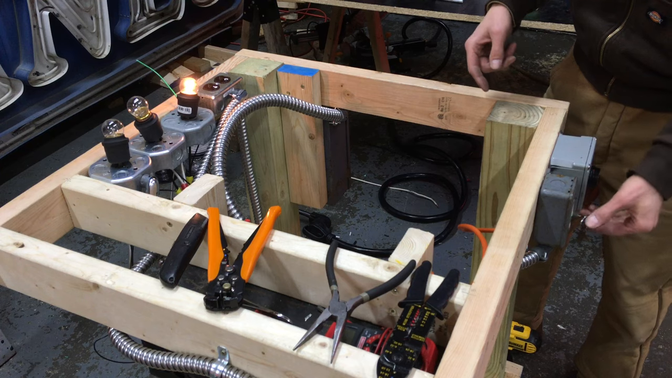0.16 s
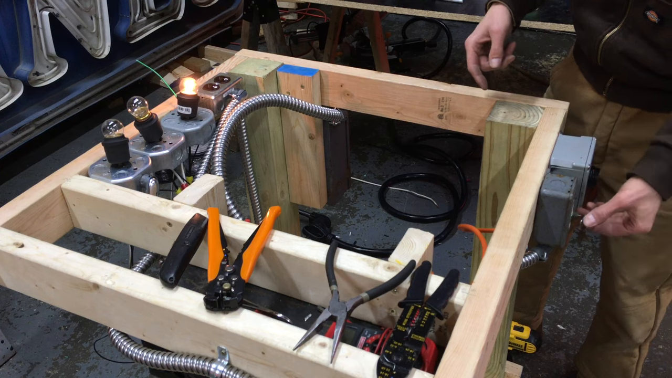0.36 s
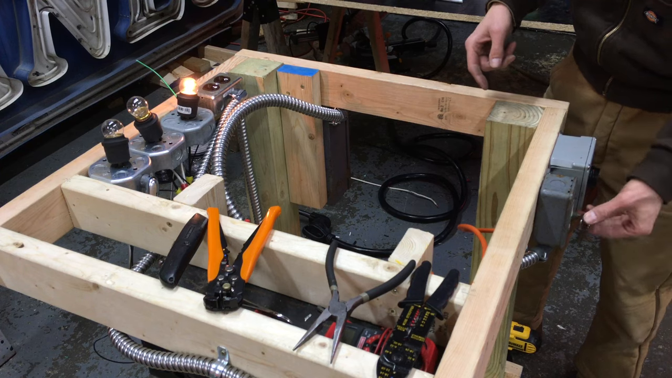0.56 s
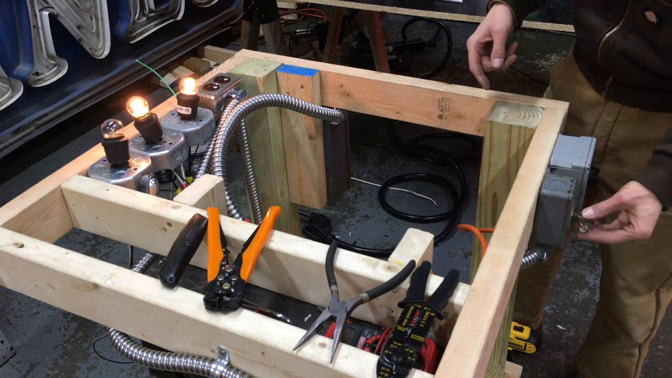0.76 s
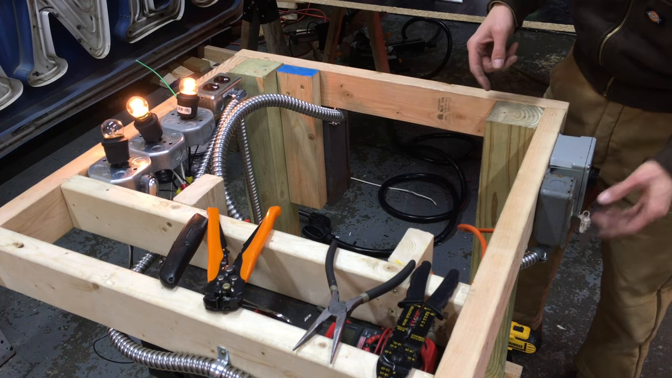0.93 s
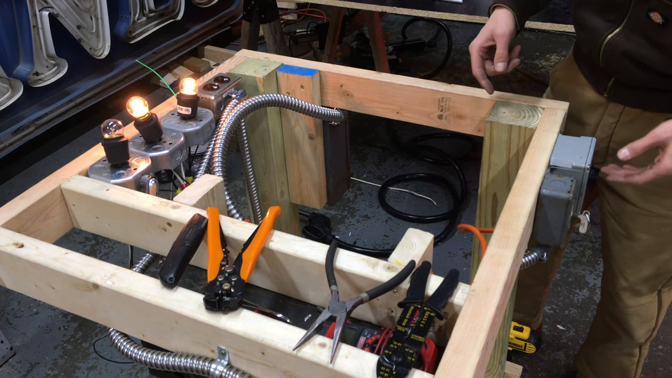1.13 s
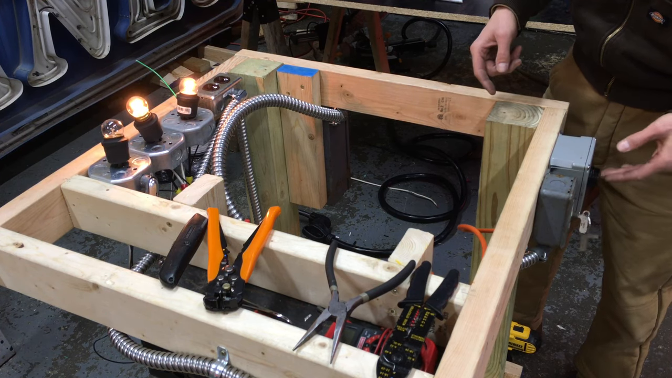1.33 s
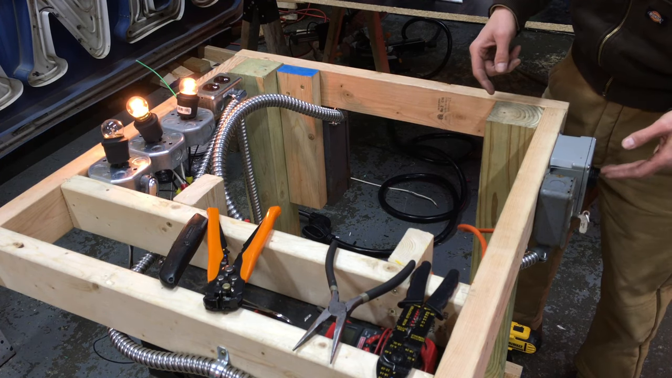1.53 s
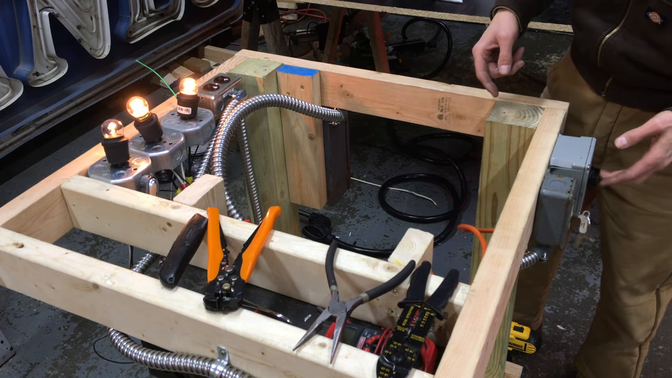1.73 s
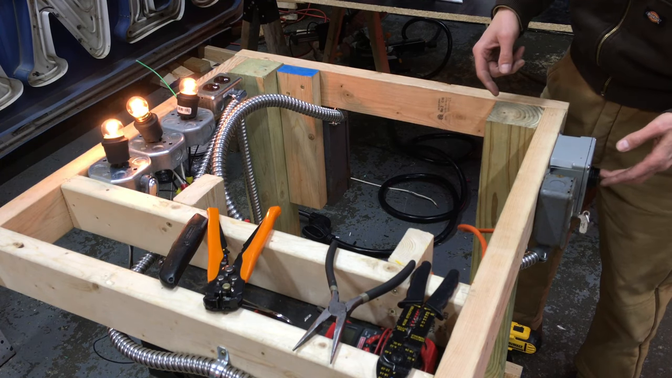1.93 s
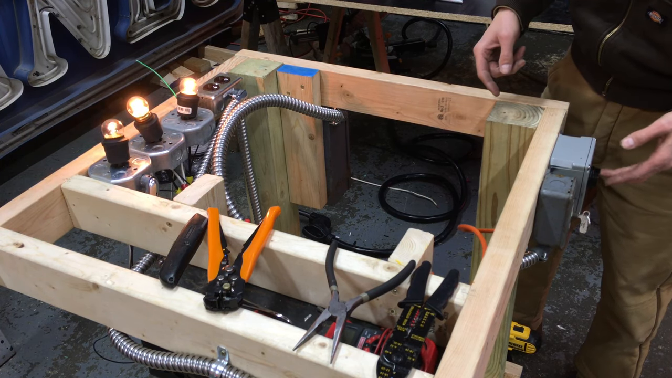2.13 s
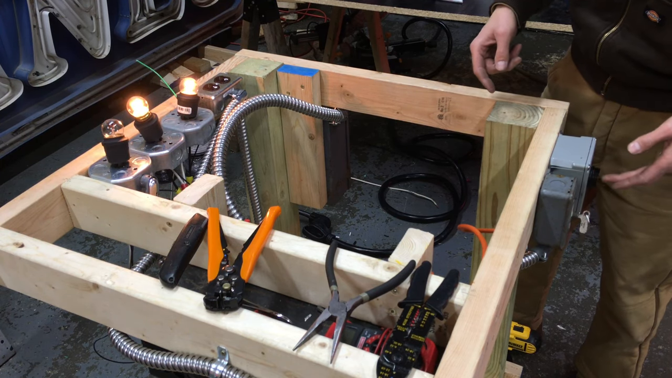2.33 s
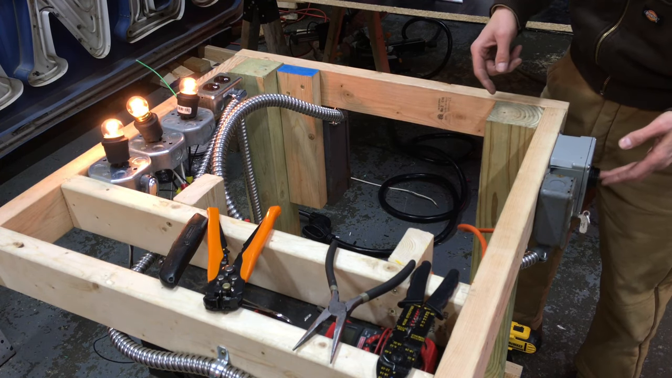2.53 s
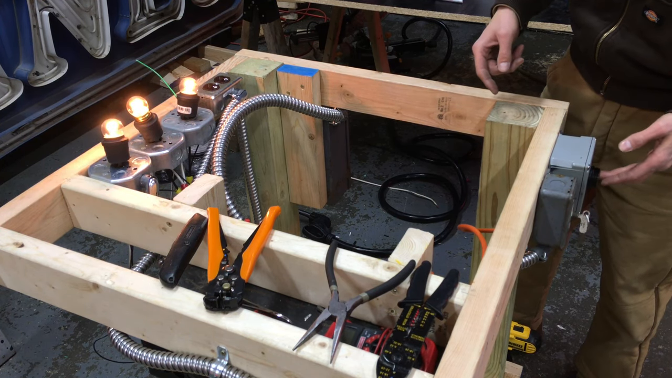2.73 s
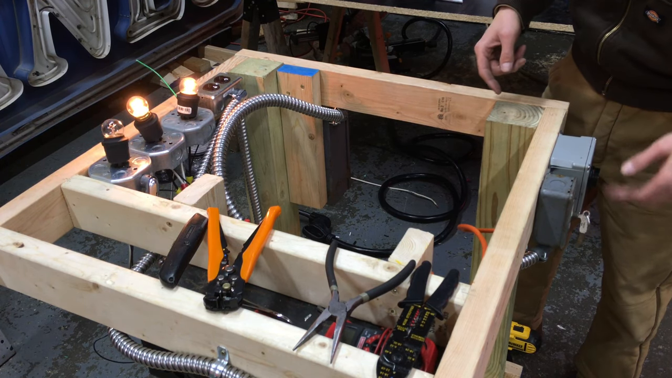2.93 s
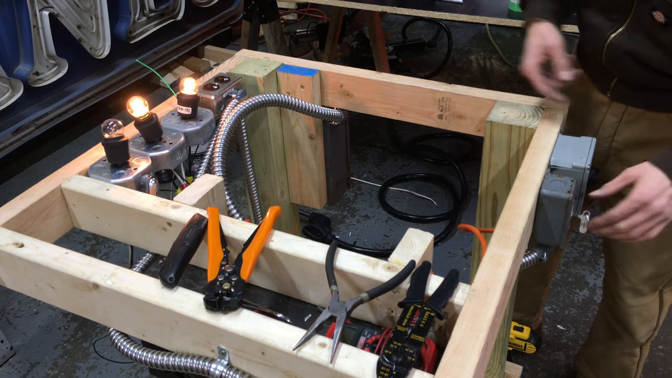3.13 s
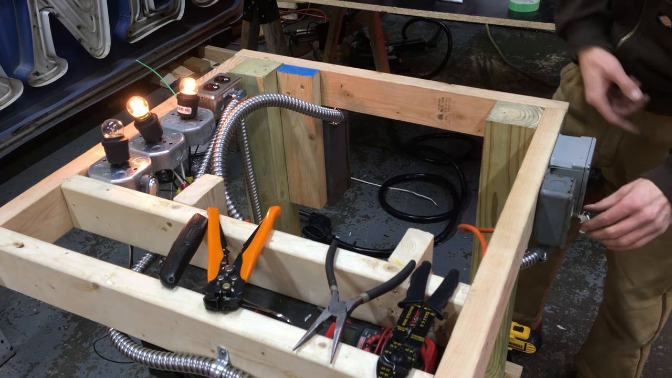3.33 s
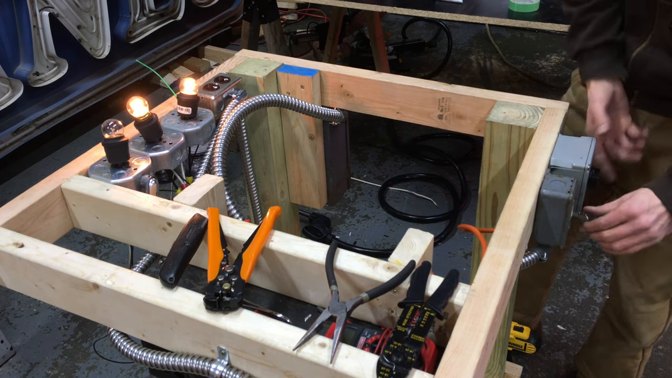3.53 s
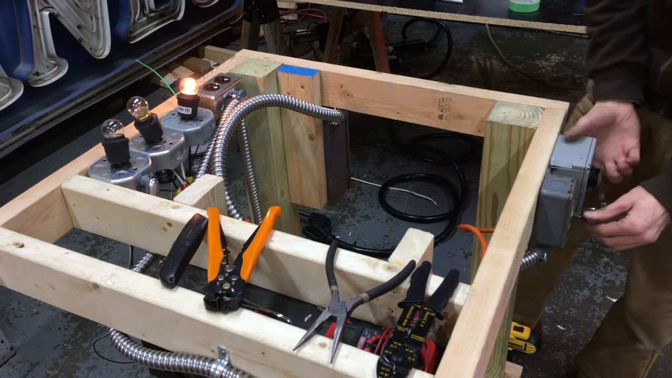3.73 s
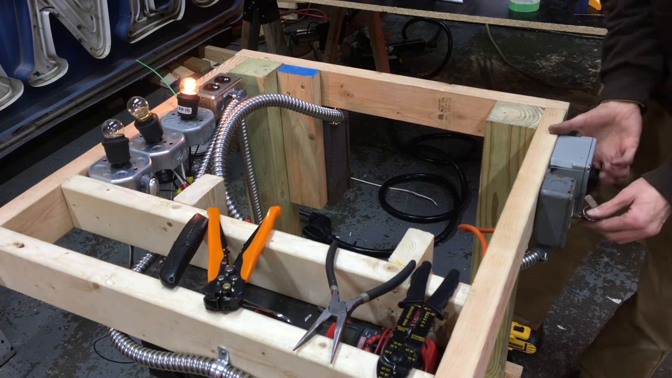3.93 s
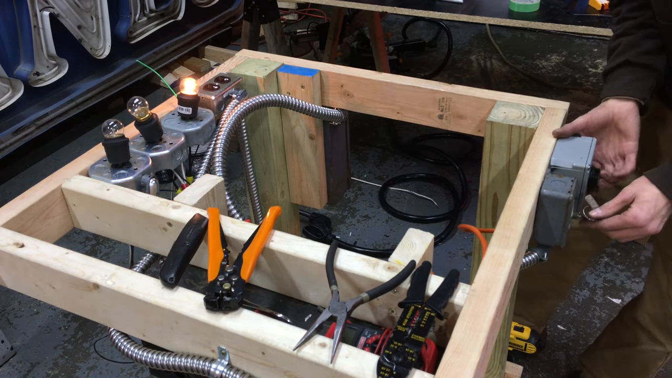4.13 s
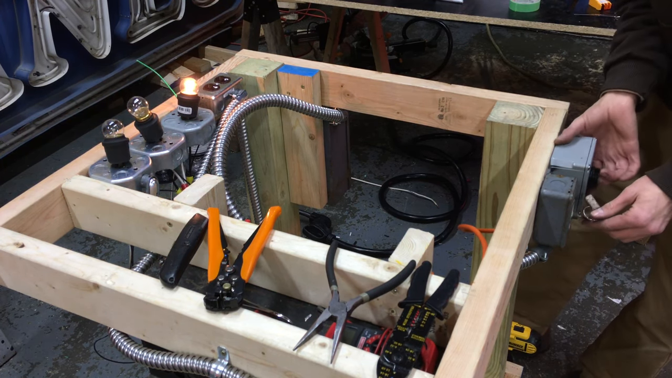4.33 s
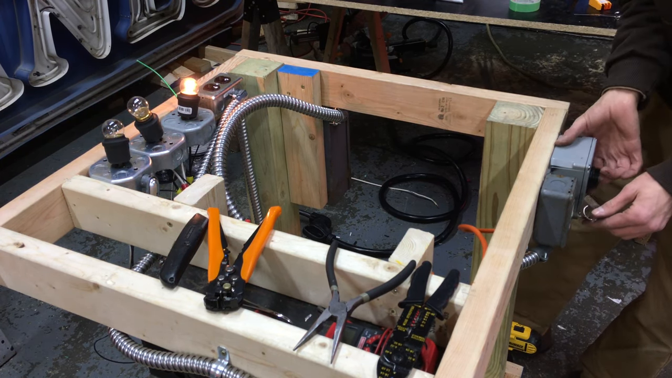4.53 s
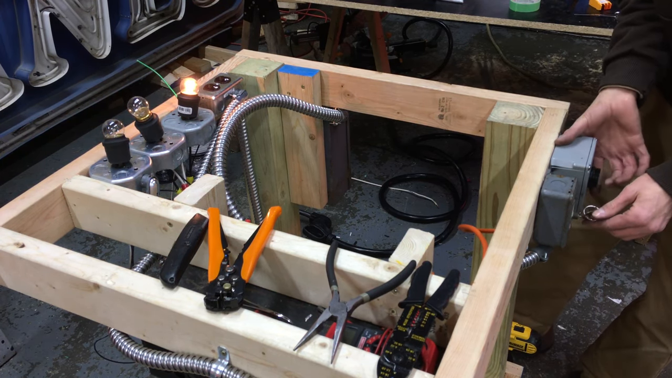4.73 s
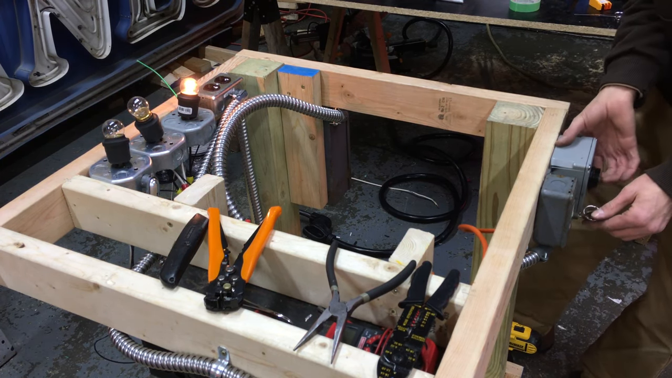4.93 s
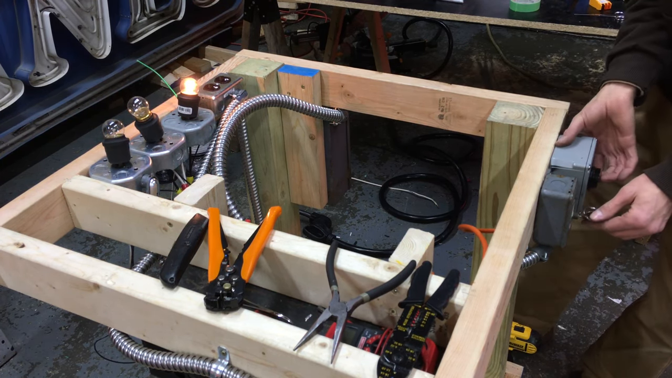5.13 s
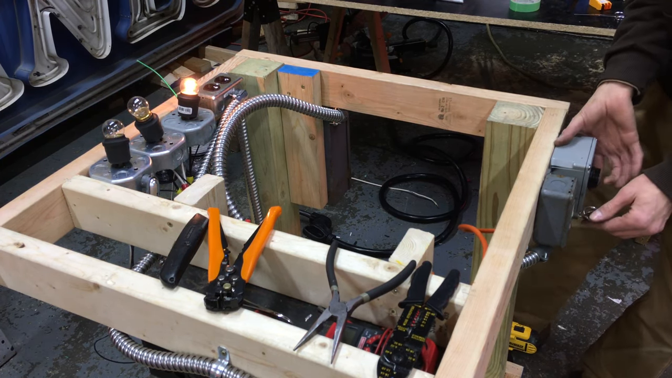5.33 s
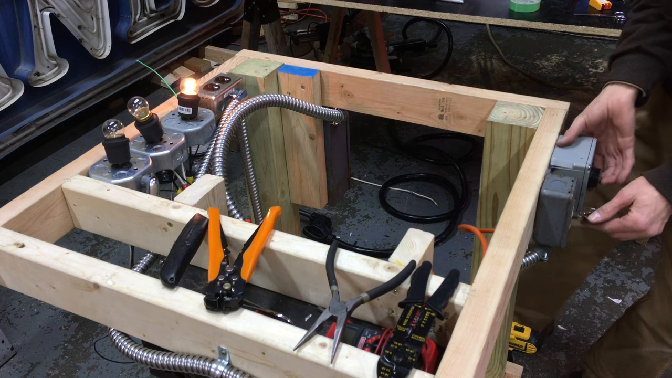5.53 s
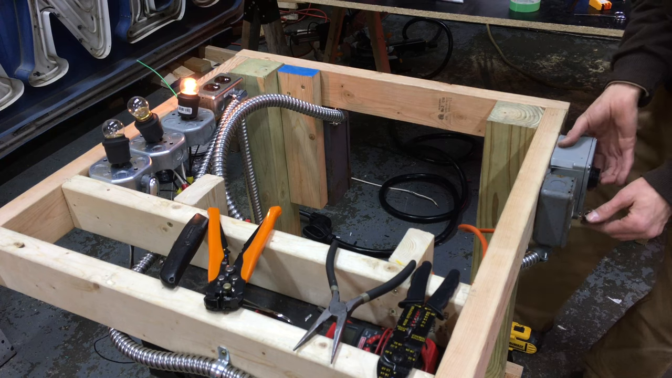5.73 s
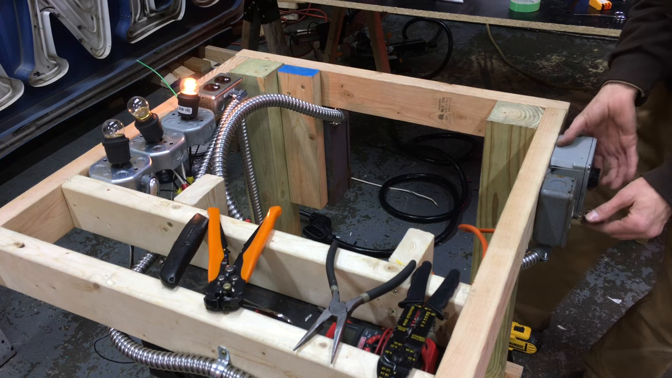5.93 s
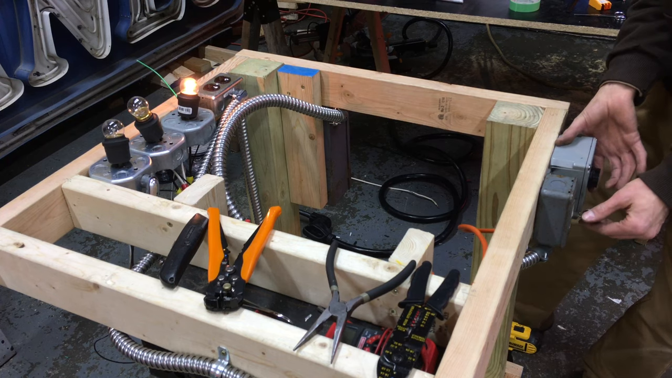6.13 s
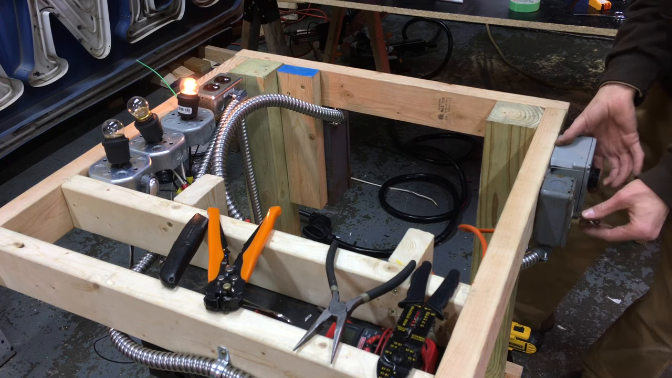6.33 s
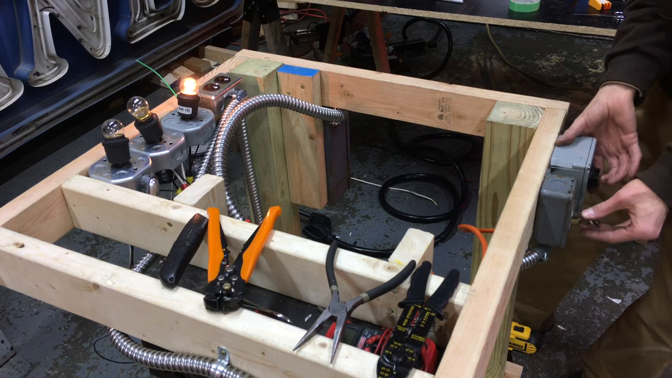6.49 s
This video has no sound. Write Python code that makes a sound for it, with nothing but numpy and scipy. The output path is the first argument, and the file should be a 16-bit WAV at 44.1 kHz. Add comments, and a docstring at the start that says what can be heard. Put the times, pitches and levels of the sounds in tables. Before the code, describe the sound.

Close microphone, hard-surfaced workshop: crisp switch clicks and dangling keys, then four violent contactor cracks alternating between ringing metallic clangs and drier slams with woody thuds. After a short pause comes one very loud snap with a cluster of clicks and key tinkles, thinning into small irregular ticks and faint handling rubs. A low throbbing machine hum and steady hiss lie underneath.

```python
"""A contactor in a steel box slams four times, pulling in and dropping out twice: noise cracks and decaying case modes.
A hand works the box's key switch: tilted noise bursts that ring tones of lid and key. Dangling keys jingle as beating
mode pairs, the wooden frame thuds as modes struck by soft pushes, and the palm rubs as low filtered noise. A diffuse
noise echo and a low room mode give the workshop; a throbbing two-tone machine hum and a faint whine lie under steady
hiss. The loudest blows clip."""
import sys
import numpy as np
from scipy import signal
from scipy.fft import rfft, irfft
from scipy.io import wavfile

SR = 44100
rng = np.random.default_rng(int(sys.argv[2]) if len(sys.argv) > 2 else 0)


def master(y):
    """Save y as 16-bit WAV."""
    cut = np.clip(np.atleast_2d(y).T, -1, 1)
    pcm = np.round(cut * 32767)  # scale
    wavfile.write(sys.argv[1], SR, pcm.astype(np.int16))


def boost(x):
    """Linear amplitude factor 10**(x/20) for a level x in decibels (scalar or array-like)."""
    u = np.asarray(x, float) / 20
    return 10 ** u


N = 289296  # samples
LEAD = SR // 4  # samples kept ahead of the start, for sounds that begin earlier
TIME = np.arange(SR) / SR  # one second [s]

# All levels are relative.
# armature blows: (time [s], crack level [dB], case ring level [dB], contact tick lead [ms], tick level [dB])
BLOWS = [(1.7452, 3, 4, 21.6, -28), (2.1529, 1, -19, 11.5, -16.5), (2.4533, 3.5, 2, 3.2, -18),
         (2.8918, 1.5, -19.5, 13.2, -21)]
# dense mode clusters of the sheet-steel case, the lowest (near 138 Hz) a room mode that the blows set booming:
# (frequency [Hz], half-width [Hz], level [dB], T60 [s])
CASE_MODES = [(137.6, 14, -27, 0.39), (190.8, 33, -25.5, 0.34), (279, 41, -16, 0.42), (357, 46, -24, 0.57),
              (804, 110, -14.5, 0.66), (1124, 120, -12.5, 0.49), (1258, 40, -5.5, 1.01),
              (1306, 160, 9.5, 0.14), (1393, 25, -9, 0.15), (1564, 170, -15, 0.78), (1764, 180, -10, 0.86),
              (1805, 120, -1.5, 0.2), (2350, 200, -15, 0.6), (2556, 240, -12, 0.85),
              (3400, 250, -19.5, .85), (6000, 140, -9.5, 0.035)]
# spectrum of the armature's crack: (frequency [Hz], level per Hz [dB])
CRACK_SPECTRUM = [(59, -43.5), (100, -25.5), (289, -7.5), (433, -11.5), (784, -4.5), (1010, -11.5),
                  (1250, -11.5), (1760, -5), (3400, -7), (6700, -3.5), (7770, -6.5), (13500, -9.5),
                  (16000, -14)]
CRACK_DECAY_MS = 14  # time constant

# switch and key clicks, the longer ones scrape:
# (time [s], level [dB], pitch [Hz], treble tilt [dB per octave, nominal], decay time constant [ms])
CLICKS = [(0.291, -39, 1650, -2, 5.5), (0.6781, -24, 2520, -0.6, 31), (0.6929, -2, 5340, 3, 5.5),
          (0.782, -8, 7500, 3, 4.8), (0.86, -25, 6000, 3, 3), (.8709, -26.5, 2530, -1, 5.3),
          (0.8894, -19, 2630, 2.5, 25), (0.9465, -15, 3854, 4, 6.7), (1.0456, -23.5, 3410, -1, 8.5),
          (1.1188, -31.5, 2670, 0.4, 25), (1.1873, -15.5, 2324, 0.5, 7.6), (1.4565, -32, 3530, -0.5, 11),
          (1.6633, -30, 5470, -0.5, 4.6), (3.1861, -12, 2620, 12, 6.4), (3.4448, -29, 2320, 0.5, 4),
          (3.575, -36.5, 3030, 0.9, 14), (3.599, -21.5, 3450, 5, 9.4), (3.6123, 4, 3400, 1.5, 4.7),
          (3.64, -11, 8500, 3, 6.9), (3.705, -8.5, 3480, 1, 3.54), (3.7704, -18, 3380, 13, 4.8),
          (3.795, -14.5, 3530, 6.5, 7.3), (3.914, -14, 8000, 8.5, 3.8), (4.0712, -29.5, 2935, -4, 4.8),
          (4.0921, -28.5, 2330, -3.5, 4.6), (4.25, -36, 7200, -2, 4.8), (4.3763, -29.5, 1508, -3.5, 4),
          (4.6239, -28.5, 3530, -1.5, 14), (4.6565, -16, 1520, -1.5, 6.6), (4.6941, -18, 8000, 9, 3.4),
          (4.71, -21.5, 6230, -1, 5.8), (4.7128, -21, 3500, -0.5, 6.1), (4.8603, -31, 2790, -2.5, 5.4),
          (4.9424, -30.5, 1086, -9, 5), (5.2345, -22.5, 3400, -2, 5.4), (5.2869, -22.5, 1790, 0.5, 4.9),
          (5.2866, -11.5, 5350, 2, 4.1), (5.2884, -22, 2850, -5.5, 5.3), (5.4307, -30.5, 2850, -6.5, 4),
          (5.4537, -37, 2796, -4, 3.8), (5.504, -29, 1915, -3, 2.64), (5.5186, -23.5, 5400, 0, 3),
          (5.7483, -37.5, 1620, -4, 3.9), (5.8826, -36, 1620, -4, 7.5), (5.9053, -25, 2400, 1, 3.6),
          (5.917, -10.5, 2890, -2, 5.05), (6.159, -42.5, 3053, 2.8, 8.1), (6.3197, -44, 1567, 0.5, 12.7),
          (6.3594, -37.5, 5110, 1.5, 8.3)]
# a click ahead of the start, its echo still dying away there; columns as in CLICKS
EARLIER_CLICK = (-.04, -14, 2800, -3, 4)
# duller clicks carry more body resonance, between two limits of tilt
BODY_DB, BODY_DB_PER_TILT, DULLEST_TILT, BRIGHTEST_TILT = -10, -4.5, 0.5, 1.5
# tones that clicks ring, of the lid and, at 6160 Hz, of a key:
# (frequency [Hz], half-width [Hz], level [dB], T60 [s])
CLICK_TONES = [(1038, 100, 3.54, 0.32), (1810, 210, -0.3, 0.67), (2530, 50, 2.5, 1),
               (2850, 420, 1.26, 0.35), (3400, 420, -5, .5), (5350, 340, 0.5, 0.21), (6160, 40, 4.5, 0.33)]
TONE_DB, TONE_REACH_OCTAVES = -18.5, 0.11  # a click rings the tones near its own pitch
BOUNCE_MS, BOUNCE_DB = 3.7, -22.5  # each click comes back, smeared, from the bench top

# keys knocking together:
# (time [s], level [dB], lower mode against the upper [dB], time until another key or the hand damps it [s])
JINGLES = [(.693, -36, -15, 0.055), (.782, -33, -7, 0.09), (.889, -39, 12, 0.0087), (0.945, -38, 5, 0.054),
           (1.045, -39, -28, 0.051), (1.186, -39, -4, .4), (3.185, -23.5, -14, 0.27),
           (3.611, -17, -6, 0.032), (3.643, -28, -17, 0.017), (3.657, -30, 3, 0.026),
           (3.705, -30, -8, 0.08), (3.795, -20, -17, 0.022), (3.82, -39, -14, 0.077),
           (3.913, -46, -2.5, 0.028), (4.709, -35, -15, 0.1)]
# lower and upper mode pair of the keys: (frequency [Hz], T60 [s], split of the pair [Hz], partner amplitude [ratio])
KEY_MODES = [(12450, .3, 22, .5), (15530, .22, 30, .4)]
# mode pair of the steel ring that holds the keys; columns as in KEY_MODES
KEY_RING_MODE = (7181, 1.1, 5, .9)
# knocks on that ring: (time [s], level [dB], time until damped [s])
RING_KNOCKS = [(0.947, -41.5, 0.086), (1.188, -45.5, 0.46), (3.185, -57, .26), (3.657, -43, .04),
               (3.795, -50, 0.074), (4.736, -62, .15)]

# thuds through the wooden frame: (time [s], level [dB], push length [ms], room boom level [dB])
THUDS = [(0.694, -32, 1.2, -31.5), (.79, -45.5, 0.5, -62), (.89, -41, 0.84, -60), (.947, -41.5, 0.95, -60),
         (1.046, -41.5, 0.32, -60.5), (2.16, -25.5, 2.4, -28.5), (2.9, -25.5, 2.3, -29),
         (3.616, -29.5, 0.76, -39), (3.701, -37, 0.58, -64), (4.374, -40.5, 2.9, -30.5),
         (4.661, -40.5, 1.9, -52.5), (5.29, -50, 3.2, -53), (5.449, -45.5, 2.8, -41),
         (5.918, -43, 2, -63.5)]
# mode clusters of the timber: (frequency [Hz], half-width [Hz], level [dB], T60 [s])
FRAME_MODES = [(198, 82, -3, 0.072), (278, 96, -1, 0.073), (391, 82, -6, 0.27), (507, 100, -7.5, 0.13),
               (627, 120, -5.5, 0.34), (954, 160, -8.5, 0.11)]
BOOM_HZ, BOOM_T60_S = 133.6, 0.28  # a low room mode

# palm pressing on the box: (time of most pressure [s], level [dB], build-up [s])
RUBS = [(4.3, -51, 0.32), (4.439, -50.5, 0.15), (4.751, -49.5, 0.23), (4.96, -58, .1), (5.311, -53, .15),
        (5.451, -47, 0.038), (5.899, -50.5, .03), (6.299, -58.5, 0.045)]
# spectrum of the rubbing palm: (frequency [Hz], level per Hz [dB])
PALM_SPECTRUM = [(80, -36), (140, -1.5), (250, 3), (450, -12.5), (1000, -15), (3000, -33.5)]
LET_GO_S = 0.083  # the rub fades to about a third in this time

# reverberation time of the room: (frequency [Hz], T60 [s])
ROOM_T60 = [(150, 1.0), (400, 0.99), (1040, 1.0), (2760, 1), (7280, 0.65), (14000, 0.34)]
ROOM_DB, ROOM_BUILD_MS = -6.5, 1.1  # the echo's energy, and its build-up time constant

# two motors beating: (frequency [Hz], level [dB])
HUM = [(45.2, -62), (47.8, -55)]
# hum level over time, a slow irregular rise and fall: (time [s], level [dB])
HUM_LEVEL = [(0, 10), (.8, -7), (1.5, 8), (2.2, 2.5), (2.9, -8.5), (3.5, -1), (4.2, 0), (4.9, -0.5),
             (5.6, -13), (6.2, -9), (6.56, 1)]
HUM_SWELL_S = 4.15  # a moment when the two motors are in step
WHINE_HZ, WHINE_DB = 1564, -74  # a faint steady tone from a distant machine
# spectrum of room and microphone hiss: (frequency [Hz], level per Hz [dB])
HISS_SPECTRUM = [(15, -33.5), (25, -7), (53, 3), (76, -8), (242, -11.5), (384, -17.5), (427, -22.5),
                 (988, -22.5), (1260, -29), (1610, -30), (2760, -38), (3820, -41), (6920, -42.5),
                 (14800, -37), (16000, -52)]
HISS_DB = -49.5
# response of the microphone: (frequency [Hz], gain [dB])
MIC_RESPONSE = [(25, -20.5), (42, 0), (4300, 1.5), (4900, -0.5), (5600, 2), (7000, 2.5), (7600, -4),
                (8400, 1.5), (9900, 1), (10400, -4), (11200, 1.5)]
TOP_HZ = 15800  # edge of the final low-pass


def colour(x, table):
    """Linear filtering: multiplies the spectrum by a gain curve, straight in dB over log frequency."""
    hz, db = np.transpose(table)
    grid = np.maximum(np.fft.rfftfreq(len(x), 1 / SR), 1)
    gain = boost(np.interp(np.log(grid), np.log(hz), db))
    return irfft(rfft(x) * gain, len(x))


def unit(x):
    """Normalisation of mean power: scales to rms 1."""
    return x / np.sqrt(np.mean(x ** 2))


def add(track, s, sound):
    """Superposition: sums a sound into the track at time s."""
    i = LEAD + int(s * SR)
    track[i:i + len(sound)] += sound[:len(track) - i]


def burst(noise, decay_ms, rise_ms=0.21):
    """Transient noise: an exponential approach times an exponential decay."""
    t_ms = TIME[:len(noise)] * 1000
    return noise * (1 - np.exp(-t_ms / rise_ms)) * np.exp(-t_ms / decay_ms)


def impact(table):
    """Impulse response: a single hard contact with the given spectrum, energy 1."""
    pulse = colour(signal.unit_impulse(2048, 256), table)[224:]
    return pulse / np.sqrt(np.sum(pulse ** 2))


def ring(hz, t60, phase=0):
    """Damped free vibration: one struck mode falls 60 dB in its T60."""
    return np.sin(2 * np.pi * hz * TIME + phase) * 1000. ** (-TIME / t60)


def throb(db, held, hz, t60, split_hz, share):
    """Beating: a close mode pair throbs at its difference frequency until it is damped."""
    damping = np.exp(-np.maximum(TIME - held, 0) / 0.008)
    pair = ring(hz, t60) + share * ring(hz + split_hz, t60, np.pi / 2)
    return boost(db) * damping * pair


def cluster(hz, width_hz, t60, count=9):
    """Modal overlap: close modes, strongest in mid-band, in random phase, make a rough, fluttering ring."""
    chance = rng.random((count, 2))
    place = 2 * (np.arange(count) + chance[:, 0]) / count - 1
    weight = 1 / (1 + (2 * place) ** 2)
    t = TIME[:int(t60 * SR)]  # silent after that
    waves = np.sin(2 * np.pi * ((hz + width_hz * place)[:, None] * t + chance[:, 1:]))
    total = weight @ waves / np.sqrt(np.sum(weight ** 2))
    return np.pad(total * 1000. ** (-t / t60), (0, SR - len(t)))


def modes(table, count):
    """Modal superposition: the mode clusters of a body sum to its ring."""
    return sum(boost(db) * cluster(hz, width_hz, t60, count=count) for hz, width_hz, db, t60 in table)


def background():
    """Beating of two distant motors, over a faint whine and steady broadband room and microphone hiss."""
    t = np.arange(N) / SR
    hum = sum(np.sqrt(2) * boost(db) * np.sin(2 * np.pi * hz * (t - HUM_SWELL_S)) for hz, db in HUM)
    hum = hum * boost(np.interp(t, *np.transpose(HUM_LEVEL)))
    whine = np.sqrt(2) * boost(WHINE_DB) * np.sin(2 * np.pi * WHINE_HZ * t)
    hiss = boost(HISS_DB) * unit(colour(rng.standard_normal(N), HISS_SPECTRUM))
    return whine + hum + hiss


def room():
    """Diffuse reverberation: half-octave noise bands decay exponentially, the treble dying first."""
    t = np.arange(3 * SR // 2) / SR
    table_hz, table_t60 = np.transpose(ROOM_T60)
    echo = 0
    for hz in 60 * 2 ** np.arange(0, 8.5, 0.5):
        half, quarter = np.sqrt(2), 2 ** 0.25  # half and quarter octave
        band_shape = [(hz / half, -40), (hz / quarter, -3), (hz, 0), (hz * quarter, -3), (hz * half, -40)]
        band = colour(rng.standard_normal(len(t)), band_shape)
        t60 = np.interp(np.log(hz), np.log(table_hz), table_t60)
        echo = echo + band * 1000. ** (-t / t60)
    echo = echo * (1 - np.exp(-1000 * t / ROOM_BUILD_MS))
    return boost(ROOM_DB) * echo / np.sqrt(np.sum(echo ** 2))


def hand():
    """Friction noise: a soft low rub follows the pressure, which builds up evenly, then fades exponentially."""
    t = np.arange(N) / SR
    pressure = 0
    for s, db, build_s in RUBS:
        build = np.maximum(1 + (t - s) / build_s, 0)
        fade = np.exp(-np.abs(t - s) / LET_GO_S)
        pressure = pressure + boost(db) * np.where(t < s, build, fade)
    return pressure * unit(colour(rng.standard_normal(N), PALM_SPECTRUM))


def frame():
    """Convolution of force and response: a soft push, longer for duller thuds, rings timber; a room mode booms in."""
    out = np.zeros(LEAD + N)
    for s, db, push_ms, boom_db in THUDS:
        push = np.hanning(int(push_ms * SR / 1000) + 3)
        timber = modes(FRAME_MODES, count=9) * (1 - np.exp(-TIME / 0.002))
        add(out, s, boost(db) * np.convolve(timber, push / push.sum()))
        # the room booms in, more slowly than the timber
        add(out, s, boost(boom_db) * ring(BOOM_HZ, BOOM_T60_S) * (1 - np.exp(-TIME / 0.05)))
    return out


def keys():
    """Split modes: thin brass keys ring in two beating mode pairs, their steel ring in one."""
    out = np.zeros(LEAD + N)
    lower, upper = KEY_MODES
    for s, db, lower_db, held in JINGLES:
        add(out, s, throb(db + lower_db, held, *lower) + throb(db, held, *upper))
    for s, db, held in RING_KNOCKS:
        add(out, s, throb(db, held, *KEY_RING_MODE))
    return out


def clicks():
    """Impact excitation: tilted bursts ring a broad resonance and tones; rows: near sound, what fills the room."""
    near, far = np.zeros((2, LEAD + N))
    tones = np.array([boost(db) * cluster(hz, width_hz, t60, count=16) for hz, width_hz, db, t60 in CLICK_TONES])
    tone_hz = np.array(CLICK_TONES)[:, 0]
    for s, db, hz, tilt_db, decay_ms in [EARLIER_CLICK, *CLICKS]:
        body_db = BODY_DB + BODY_DB_PER_TILT * np.clip(tilt_db, DULLEST_TILT, BRIGHTEST_TILT)
        tilt = [(300, -22.0 - 2 * tilt_db), (1200, 0.002), (16000, 4 * tilt_db)]
        noise = unit(colour(rng.standard_normal(SR // 8), tilt))
        tick = np.pad(impact(tilt), (0, len(noise)))[:len(noise)]
        resonance = signal.iirpeak(hz, 5.0, SR)

        # the shorter the contact, the harder its first tick
        snap = 32.0 / decay_ms * tick + burst(noise, decay_ms)
        snap = unit(snap) + boost(body_db) * unit(signal.lfilter(*resonance, snap))
        snap = boost(db - 2.0) * snap / np.abs(snap).max()
        add(near, s, snap)
        bounce = burst(noise[::-1], decay_ms, rise_ms=0.8)
        add(near, s + BOUNCE_MS / 1000, boost(db + BOUNCE_DB) * bounce)

        # the room is fed mostly by the tick, with a little of the whole snap, noise burst included
        smooth = unit(tick) + boost(body_db) * unit(signal.lfilter(*resonance, tick))
        add(far, s, boost(-2) * unit(smooth) * np.std(snap) + boost(-11) * snap)

        reach = 1 / (1 + (np.log2(tone_hz / hz) / TONE_REACH_OCTAVES) ** 4)
        tone_ring = boost(db + body_db + TONE_DB) * reach @ tones
        add(near, s, tone_ring)
        add(far, s, boost(-4.5) * tone_ring)
    return np.array([near, far])


def contactor():
    """Impact and modal response: a contact tick, then the armature's crack rings the case; rows as in clicks()."""
    near, far = np.zeros((2, LEAD + N))
    for s, crack_db, ring_db, lead_ms, tick_db in BLOWS:
        noise = unit(colour(rng.standard_normal(SR // 4), CRACK_SPECTRUM))
        add(near, s - lead_ms / 1000, boost(tick_db) * burst(noise[::-1], 11.0, rise_ms=5.5))
        add(near, s, boost(crack_db - 6.0) * burst(noise, CRACK_DECAY_MS, rise_ms=0.88))
        add(far, s, boost(crack_db + 19.5) * impact(CRACK_SPECTRUM))
        # the case takes a few ms to ring up while the armature chatters
        ring_up = 1 - np.exp(-TIME / 0.0024)
        case = boost(ring_db - 10.5) * modes(CASE_MODES, count=30) * ring_up
        add(near, s, case)
        add(far, s, boost(-4) * case)
    return np.array([near, far])


def scene():
    """Direct and reverberant field: near sound plus the room's echo, over the background."""
    near, far = contactor() + clicks()
    thuds, jingle = frame(), keys()
    room_feed = far + boost(3.5) * thuds + boost(-12.5) * jingle
    wet = signal.fftconvolve(room_feed, room())[:LEAD + N]
    events = (near + thuds + jingle + wet)[LEAD:]
    return (events + hand() + background())[None]


def top_cut(x):
    """Nothing passes above the cut-off."""
    return signal.sosfilt(signal.butter(12, 16620, fs=SR, output="sos"), x)


def record(dry):
    """Transducer response and overload: the microphone's uneven gain, clipping of the loudest blows, a low-pass."""
    clipped = np.clip(colour(dry[0], MIC_RESPONSE), -1, 1)[None]
    low_pass = signal.ellip(8, 0.2, 26, TOP_HZ, fs=SR, output="sos")
    mix = signal.sosfilt(low_pass, clipped)
    return top_cut(mix)


dry = scene()
out = record(dry)
master(out)
```